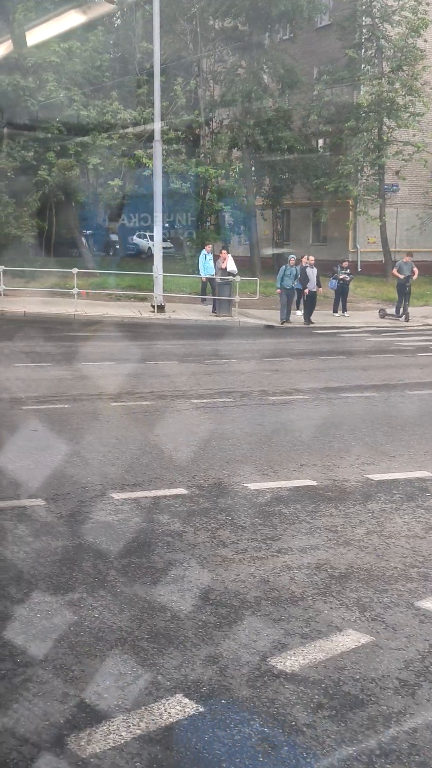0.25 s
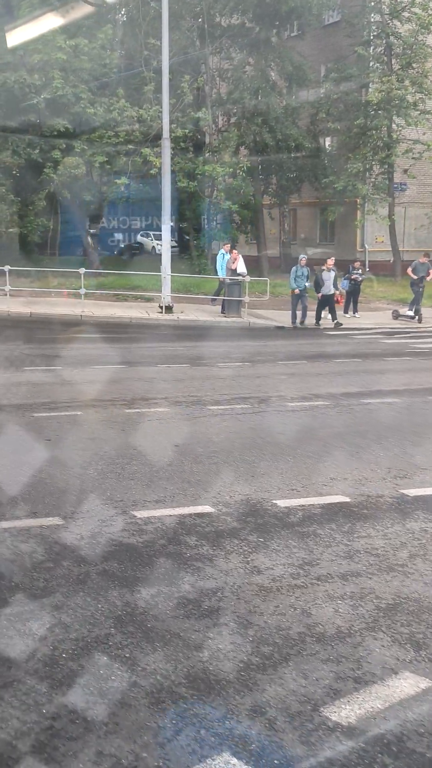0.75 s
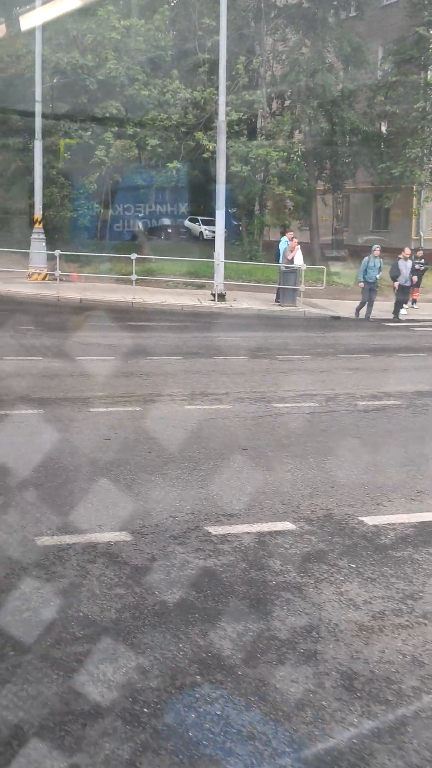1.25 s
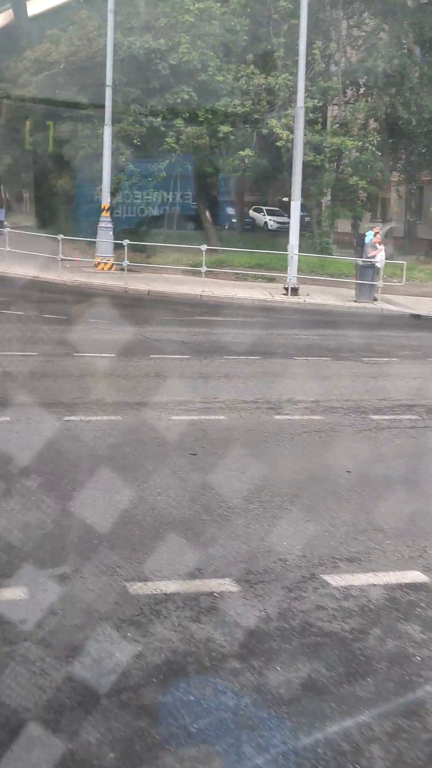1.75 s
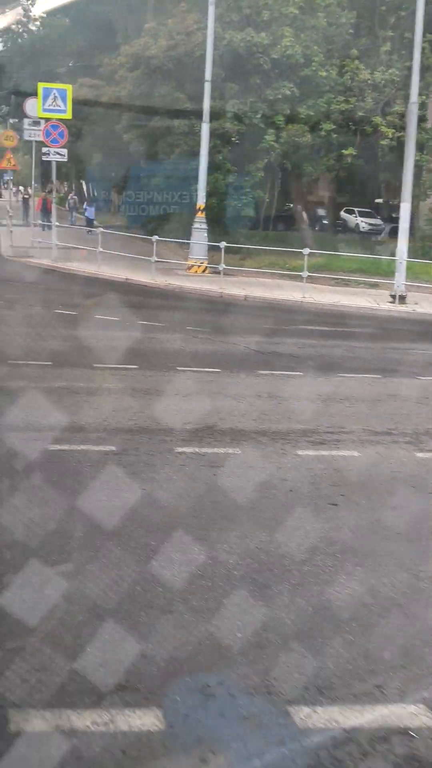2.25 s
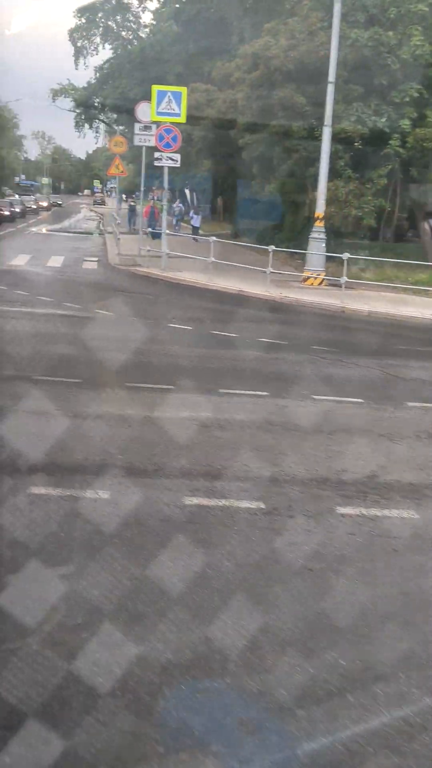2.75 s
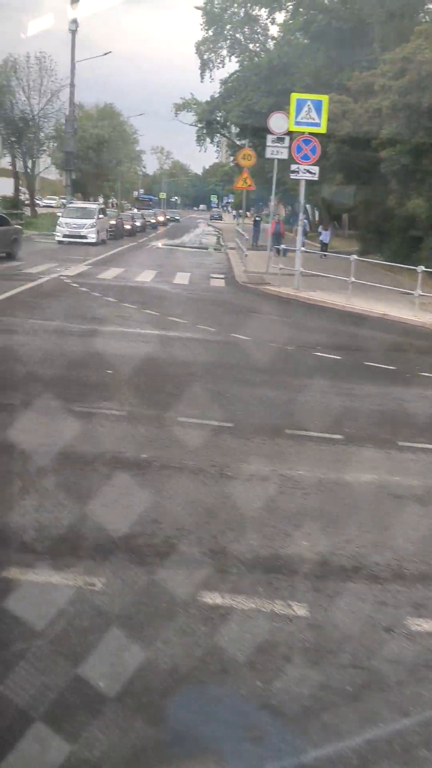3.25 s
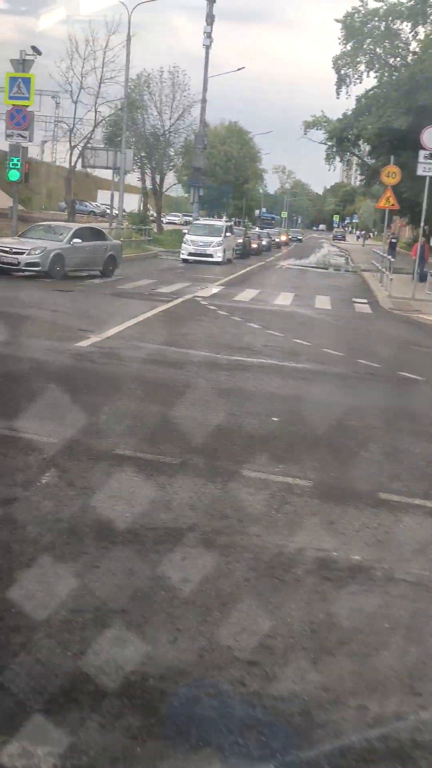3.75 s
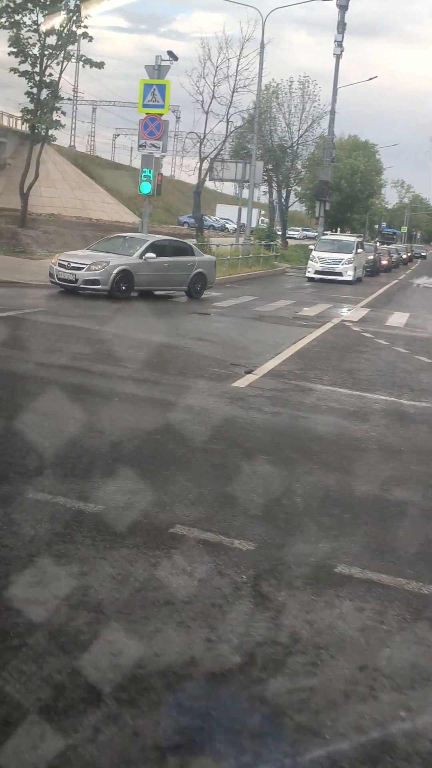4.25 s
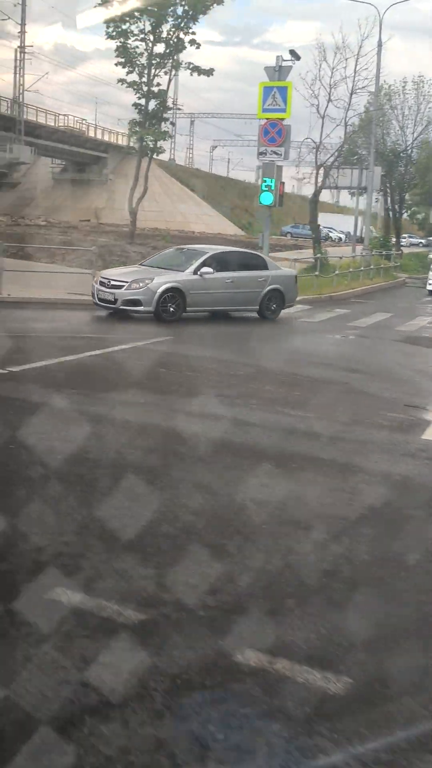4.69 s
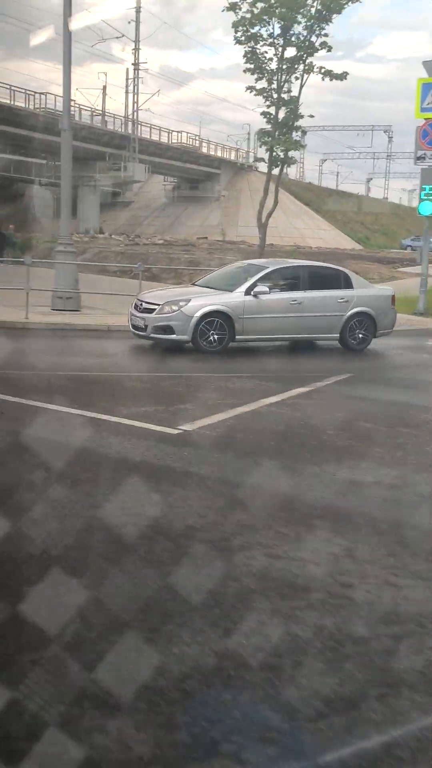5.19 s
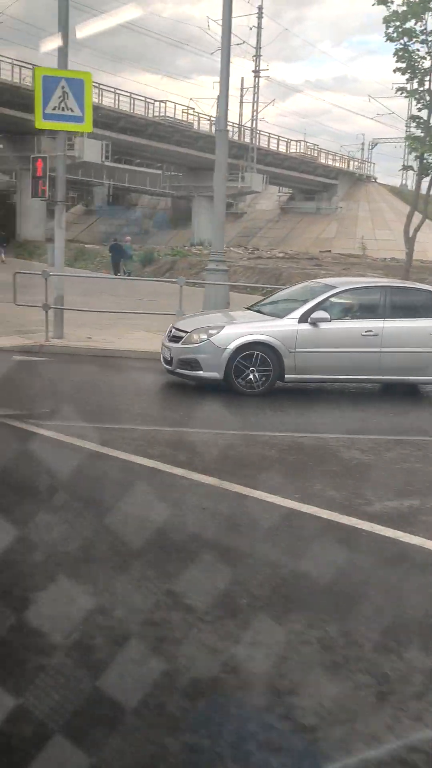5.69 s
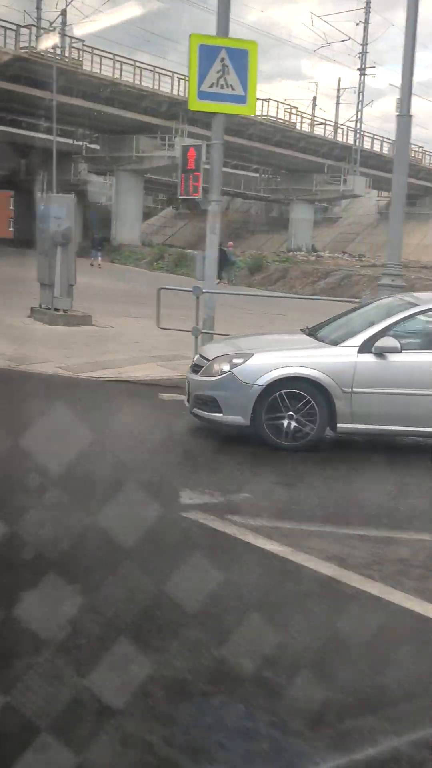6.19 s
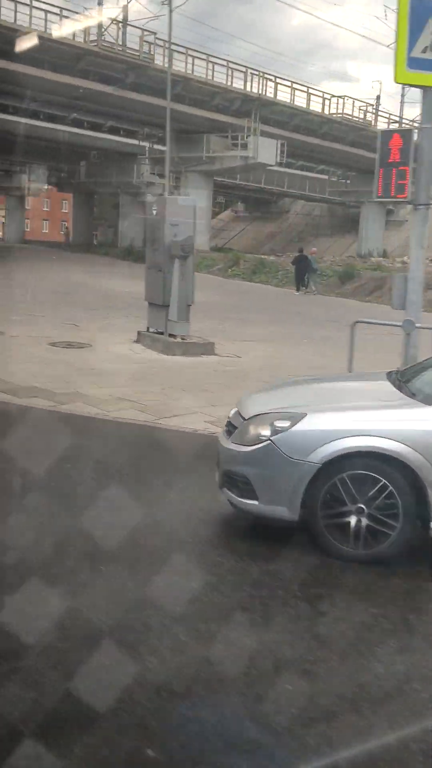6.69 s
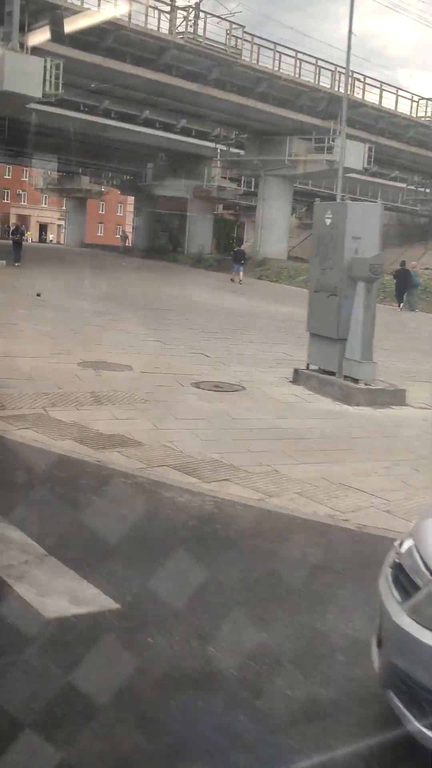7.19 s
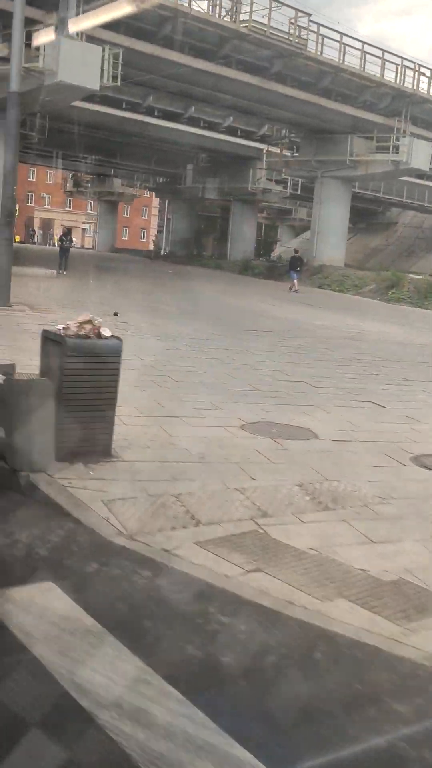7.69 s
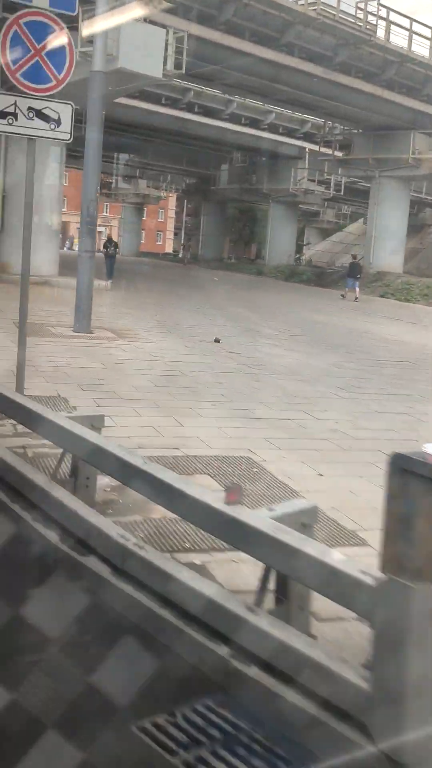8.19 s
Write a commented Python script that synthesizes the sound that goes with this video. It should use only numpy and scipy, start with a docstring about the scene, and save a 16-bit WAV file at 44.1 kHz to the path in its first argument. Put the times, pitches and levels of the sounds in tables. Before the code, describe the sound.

Inside a city bus, the diesel engine idles briefly, then pulls away through two gear changes with gear whine and road rumble.

```python
"""Inside a city bus, pulling away

The six-cylinder diesel idles, then runs up through two gear changes, its orders sweeping through the
cabin's booming resonances. Injectors clatter, the intake hisses and whistles as the turbo spools up,
an accessory drones and gears whine over the road's rumble and roar. A small electric motor sings
steadily, the body jolts twice and the trim ticks now and then."""
import sys
import numpy as np
from scipy import signal
from scipy.fft import rfft, irfft, next_fast_len
from scipy.io import wavfile
from scipy.ndimage import uniform_filter1d, minimum_filter1d

SR = 44100
rng = np.random.default_rng(int(sys.argv[2]) if len(sys.argv) > 2 else 0)


def unload_wav(signal):
    """Save mono or channel-first audio to the path in sys.argv[1] as 16-bit WAV at rate SR, clipped to [-1, 1]."""
    wavfile.write(
        sys.argv[1],
        SR,
        np.round(np.clip(np.atleast_2d(signal).T, -1, 1) * 32767).astype(np.int16),
    )


N = 372204
T = np.arange(N) / SR
CYLINDERS = 6

# An order is a multiple of the four-stroke cycle rate, played at the nearest whole number. the accessory's
# note, its octave and a higher note (order, level [dB], extra at idle [dB])
ACCESSORY_NOTES = [(27, -37, -1.5), (54, -48.5, -3), (81.6, -55, -3.5)]
# notes of the timing gears (order, level [dB], extra at idle [dB])
TIMING_NOTES = [(48, -44, 0), (71.33, -53, 8), (95.3, -58, 4.5), (118.6, -68.5, 16.5), (191.2, -66.5, 11.5),
                (216.8, -59, -1)]
# the final drive's mesh, following road speed (time [s], pitch [Hz], level [dB])
FINAL_DRIVE = [(2.0, 386.2, -44), (2.6, 408.5, -28), (3.25, 439, -30.5), (3.75, 460, -37),
               (4.5, 454.6, -35.5), (5.0, 448.6, -31), (6.6, 468.3, -42.5), (7.5, 464.7, -35),
               (8.44, 471, -31.5)]


def gain_of(db):
    """Decibels to amplitude."""
    return 10 ** (np.asarray(db) / 20)


def unit_rms(x):
    """Scales to unit rms."""
    return x / np.sqrt(np.mean(x ** 2) + 1e-20)


def curves(rows):
    """One control signal for each column after the time."""
    times, *columns = np.transpose(rows)
    return [np.interp(T, times, column) for column in columns]


def spectrum_at(points, hz):
    """Reads a spectrum on a log-frequency axis."""
    point_hz, value = np.transpose(points)
    return np.interp(np.log(hz + 1), np.log(point_hz + 1), value)


def drift(rate_hz, points=4096, hop=128):
    """Slow random wander of unit size."""
    hz = np.fft.rfftfreq(points, hop / SR)
    slow = irfft(rfft(rng.standard_normal(points)) * np.exp(-(hz / rate_hz) ** 2))
    return np.interp(np.arange(N) / hop, np.arange(points), unit_rms(slow))


def noise(colour):
    """Unit-rms stereo noise of a given dB colour, alike in both ears in the bass only."""
    # likeness of the two ears (frequency [Hz], correlation)
    likeness = [(40, 0.44), (150, 1), (300, 0.89), (500, 0.53), (1000, -0.23), (2000, -0.078),
                (5000, 0.021), (12000, -0.03)]
    size = next_fast_len(N, True)
    hz = np.fft.rfftfreq(size, 1 / SR)
    mid, side = rfft(rng.standard_normal((2, size)))
    same = spectrum_at(likeness, hz)
    mid, side = mid * np.sqrt(1 + same), side * np.sqrt(1 - same)
    return unit_rms(irfft(np.array([mid + side, mid - side]) * gain_of(colour(hz)), size)[:, :N])


def tone(hz, level, start_turns, spread_hz=620):
    """A note in the cabin: standing waves pull the ears out of phase, more so as the pitch rises."""
    phase = 2 * np.pi * (np.cumsum(hz) / SR + start_turns) % (2 * np.pi)
    apart = np.minimum(hz / spread_hz, 1) * np.sin(hz / 23 + 2 * np.pi * rng.random())
    return np.sqrt(2) * level * np.cos(np.array([phase + apart, phase - apart], np.float32))


def lift(resonances, hz):
    """Gain in dB of a note as its pitch passes a set of resonances."""
    return sum(db * np.exp(-((hz - centre) / width) ** 2) for centre, width, db in resonances)


def with_speed(rpm, db_per_octave, cruise_rpm=1350):
    """Level change in dB as the engine runs faster or slower than cruising."""
    return db_per_octave * np.log2(rpm / cruise_rpm)


def engine_state(flywheel_s=.16, idle_fade_rpm=(710, 856)):
    """Crank speed smoothed by the flywheel, its cycle rate, the load and how far the engine idles."""
    # the revs through two gear changes (time [s], crank speed [rpm])
    revs = [(0, 704), (.65, 707), (.92, 975), (1.12, 1052), (1.36, 1064), (1.82, 1240), (2.17, 1242),
            (2.57, 1394), (3.08, 1417), (3.45, 1495), (3.78, 1530), (4.45, 1480), (4.87, 1270),
            (5.55, 1282), (6.15, 1425), (6.7, 1502), (7.33, 1281), (7.58, 1282), (8.15, 1380), (8.44, 1397)]
    # the driver pulls away, eases, presses on and lifts off sharply once (time [s], load [dB])
    pedal = [(0, -5.5), (.57, -8), (.78, -1.5), (1.1, -0.5), (2.5, 1.15), (3.3, -1.7), (3.7, 0.2),
             (4.4, -1.5), (5, 1.5), (6.3, 2.3), (6.38, -3.5), (6.85, -1.5), (7.2, 0.5), (7.5, 2),
             (7.9, 2.2), (8.44, 1.5)]
    rpm = uniform_filter1d(curves(revs)[0], round(flywheel_s * SR), mode="nearest")
    cycle_hz = rpm / 120 * (1 + .0006 * drift(10))  # two crank turns a cycle
    return rpm, cycle_hz, curves(pedal)[0], np.interp(rpm, idle_fade_rpm, (1, 0))


def engine(rpm, cycle_hz, load_db, idling, weak_db=-3, throb_rpm=(1264, 1490)):
    """Firing notes sweep the cabin's booms; unequal cylinders add sidebands that throb once a cycle."""
    # the firing note and its overtones (order, level [dB], extra at idle [dB])
    firing_notes = [(6, -50, -10), (12, -31.5, -17), (18, -34, 6)]
    # the cabin's standing waves (centre [Hz], width [Hz], lift [dB])
    booms = [(57.4, 5.6, 8.5), (67.86, 2.4, 17.5), (75, 4, 24), (128.7, 3.16, 13.5), (142.7, 8.1, 14),
             (192, 7.1, 7.5), (225, 12.4, 15)]
    # sidebands from the unequal cylinders (order, relative level [dB])
    sidebands = [(7, 4), (8, -9), (9, 8.5), (10, 6.5), (11, 6), (13, 1), (14, 5), (15, -25), (16, -17.5),
                 (17, 2.5), (19, 0), (20, 1.5), (21, 4), (22, -1.5), (23, -2.5), (24, 8.5), (26, -4),
                 (28, 8.5), (30, -6.5), (32, 5.5), (34, -11.5), (36, 8), (38, 0.5), (44, -10), (50, 2.5)]
    # how strongly the cabin answers the sidebands (frequency [Hz], gain [dB])
    cabin = [(35.0, -75), (58.0, -73), (74.0, -44), (84.0, -49.5), (92.0, -45.5), (115.0, -40),
             (145.0, -28), (185.0, -36), (207.0, -33), (226.0, -21.5), (237.0, -25), (250.0, -40.5),
             (330.0, -50.5), (450.0, -53.5), (650.0, -60.5), (1100.0, -76.5)]
    starts = rng.random(30)  # one phase for each firing order, shared by its sidebands
    out = np.zeros((2, N))
    for order, db, idle_db in firing_notes:
        hz = round(order) * cycle_hz
        level = gain_of(db + idle_db * idling + lift(booms, hz) + with_speed(rpm, 14))
        out += tone(hz, level * (1 + .2 * drift(4.4)), starts[round(order / CYLINDERS)])
    # at the top of each gear the sidebands fall in step and the throb deepens
    in_step = np.interp(rpm, throb_rpm, (.34, .8))
    effort_db = with_speed(rpm, 12) + .76 * load_db + 2 * idling
    sideband_db = {round(order): db for order, db in sidebands}
    strong_orders = {round(row[0]) for row in firing_notes + ACCESSORY_NOTES + TIMING_NOTES}
    for order in sorted(set(range(7, 57)) - strong_orders):
        hz = order * cycle_hz
        level = gain_of(sideband_db.get(order, weak_db) + spectrum_at(cabin, hz) + effort_db)
        stray = (1 - in_step) * (.5 * rng.standard_normal() + .06 * drift(2))
        out += tone(hz, level * (1 + .43 * drift(3.6)), starts[round(order / CYLINDERS)] + stray)
    return out


def injectors(cycle_hz, load_db, clatter_db=-49, load_share=.57, ring_s=.03):
    """One click a firing, each cylinder at its own strength, smeared by the ringing engine block."""
    # colour of the clatter (frequency [Hz], relative level [dB])
    clatter_colour = [(500, -25), (850, 0.5), (1100, 11), (1600, 1.5), (2300, -1.5), (2650, 0.5),
                      (3050, -5), (3480, 4), (3900, -14), (5500, -14.5), (6300, -11.5), (7200, -18.5),
                      (9000, -28.5)]
    firings = CYLINDERS * np.cumsum(cycle_hz) / SR
    nearest = np.round(firings).astype(int)
    samples_off = (firings - nearest) / (CYLINDERS * cycle_hz) * SR
    strength = rng.uniform(.6, 1, CYLINDERS)
    clicks = np.exp(-samples_off ** 2 / 2) * strength[nearest % CYLINDERS]
    t = np.arange(SR // 5) / SR
    hz = np.fft.rfftfreq(len(t), 1 / SR)
    ring = rng.standard_normal((2, len(t))) * np.exp(-t / ring_s)
    block = irfft(rfft(ring) * gain_of(spectrum_at(clatter_colour, hz)), len(t))
    clatter = signal.oaconvolve(clicks[None], block, axes=1)[:, :N]
    return unit_rms(clatter) * gain_of(clatter_db + load_share * load_db)


def turbo_boost(cycle_hz, idling, lag_s=2.5, full_boost=1.35):
    """The turbo spools up slowly once the engine leaves idle."""
    keep = np.exp(-1 / (lag_s * SR))
    drive = (1 - idling) * cycle_hz / cycle_hz.max()
    return full_boost * signal.lfilter([1 - keep], [1, -keep], drive)


def intake(cycle_hz, load_db, boost, hiss_db=-44, whistle_db=-47, spurts_db=1.5, rise=.045):
    """Hiss pulsing with the firings, and fuzzy whistles that come in spurts and climb with boost."""
    # colour of the rushing air (frequency [Hz], relative level [dB])
    hiss_colour = [(900, -6), (1700, 3), (2500, 1.5), (3100, -1), (4500, -0.5), (5200, -1.5), (5900, -4),
                   (7200, -7.5), (8450, -4.5), (8750, -14.5), (10500, -12.5), (13000, -17.5), (15700, -15)]
    # whistles under boost (centre [Hz], half-width [Hz], relative level [dB])
    whistles = [(3440, 28, -7), (3570, 210, -6), (6150, 710, -3.5), (8300, 160, -10.5)]
    out = noise(lambda hz: spectrum_at(hiss_colour, hz)) * gain_of(hiss_db + load_db + drift(19))
    pedal_db = .53 * load_db  # the spinning turbo follows the pedal less than the hiss does
    for centre_hz, width_hz, db in whistles:
        band = noise(lambda hz: -20 * np.log10(1 + ((hz - centre_hz) / width_hz) ** 2))
        glide = np.exp(2j * np.pi * np.cumsum(centre_hz * rise * (boost - 1)) / SR)
        level = boost * gain_of(db + whistle_db + pedal_db + spurts_db * drift(14))
        out += (signal.hilbert(band, next_fast_len(N))[:, :N] * glide).real * level
    firing = np.cos(2 * np.pi * CYLINDERS * np.cumsum(cycle_hz) / SR)
    return out * (1 + .042 * firing)


def crank_notes(notes, panels, cycle_hz, idling, rough):
    """Notes locked to the crank; each swells as it passes the resonance of a panel."""
    out = np.zeros((2, N))
    for order, db, idle_db in notes:
        hz = round(order) * cycle_hz
        level = gain_of(db + idle_db * idling + lift(panels, hz))
        out += tone(hz, level * (1 + rough * drift(6.5)), rng.random())
    return out


def accessory(cycle_hz, idling):
    """An engine-driven accessory drones through the panels."""
    # panels it shakes (centre [Hz], width [Hz], lift [dB])
    panels = [(158, 28, 14), (239, 15.4, 19.5), (280.2, 13.1, 16), (312.8, 15.2, 14.5), (494, 34, 14.5),
              (566, 17, 10.5), (623, 17, 11.5), (841, 26, 20.5)]
    return crank_notes(ACCESSORY_NOTES, panels, cycle_hz, idling, rough=.17)


def timing_gears(cycle_hz, idling):
    """The timing gears whine, rising and falling with the revs."""
    # panels they shake (centre [Hz], width [Hz], lift [dB])
    panels = [(495, 4.8, 7.5), (553, 16, 9), (613, 16, 7), (688, 40, 9.5), (752, 20, 15),
              (870.7, 18.7, 11.5), (911, 18, 9)]
    return crank_notes(TIMING_NOTES, panels, cycle_hz, idling, rough=.28)


def final_drive(overtone_db=-16, rough=.2):
    """The final drive's teeth whine, rising with road speed."""
    hz, db = curves(FINAL_DRIVE)
    level = gain_of(db) * (1 + rough * drift(3.8))
    return tone(hz, level, rng.random()) + tone(2 * hz, level * gain_of(overtone_db), rng.random())


def road(rpm, load_db, idling, rumble_db=-21.5, roar_db=-31.5, flutter_db=1.22):
    """Panels rumble with speed and load; tyres and engine bay roar through the floor, more under load."""
    # colour of the panel rumble (frequency [Hz], relative level [dB])
    rumble_colour = [(20, -34.5), (40, -24.5), (58, -24), (74, -6), (92, -16), (140, -1.5), (190, -8),
                     (226, 7.5), (262, -20), (340, -12), (450, -18), (650, -33), (1000, -58.5)]
    # colour of the roar (frequency [Hz], relative level [dB])
    roar_colour = [(150, -27.5), (350, 4), (450, 5.5), (520, -5), (620, 4.5), (720, -6), (790, -2),
                   (860, -4), (1000, -6), (1200, -12.5), (1420, -11), (1650, -27), (2400, -25.5),
                   (4000, -55.5)]
    mesh_hz, _ = curves(FINAL_DRIVE)
    rolling_db = 11 * np.log2(mesh_hz / mesh_hz.max())
    effort_db = with_speed(rpm, 4) + .5 * load_db - 3 * idling
    rumble = noise(lambda hz: spectrum_at(rumble_colour, hz))
    rumble *= gain_of(rumble_db + rolling_db + effort_db)
    roar = noise(lambda hz: spectrum_at(roar_colour, hz))
    roar *= gain_of(roar_db + .87 * load_db + flutter_db * drift(25))
    return rumble + roar


def electric_motor(waver=.00097, flutter_db=2.2):
    """A small electric motor sings thin, steady tones that flutter in each ear."""
    # its tones (pitch [Hz], level [dB])
    tones = [(2785, -60.5), (4177, -50.5), (5570, -64)]
    # their shared swell (time [s], gain [dB])
    swell = [(0, -4.5), (1.3, -1.5), (3.3, -4.5), (4.2, -7.5), (5.1, 0), (6.5, -7), (7.2, -3.5),
             (8.44, -6.5)]
    swell_db, = curves(swell)
    speed = 1 + waver * drift(3.26)
    out = np.zeros((2, N))
    for hz, db in tones:
        flutter = flutter_db * np.array([drift(22), drift(22)])
        out += tone(hz * speed, gain_of(db + swell_db + flutter), rng.random(), spread_hz=6000)
    return out


def knocks(rows, attack_s, stereo_width):
    """Short bursts of noise in one band each, dying away."""
    out, t = np.zeros((2, N)), np.arange(SR // 2) / SR
    hz = np.fft.rfftfreq(len(t), 1 / SR) + 1
    for start_s, db, centre_hz, octaves, decay_s in rows:
        band = np.exp(-.5 * (np.log2(hz / centre_hz) / octaves) ** 2)
        mid, side = irfft(band * np.exp(2j * np.pi * rng.random((2, len(hz)))), len(t))
        stereo = np.array([mid + stereo_width * side, mid - stereo_width * side])
        envelope = (1 - np.exp(-t / attack_s)) * np.exp(-t / decay_s)
        burst = unit_rms(stereo * envelope) * np.sqrt(np.mean(envelope ** 2))
        slot = out[:, round(start_s * SR):][:, :len(t)]
        slot += gain_of(db) * burst[:, :slot.shape[1]]
    return out


def body_jolts():
    """The body jolts with soft, low thuds near the centre."""
    # thuds (time [s], level [dB], centre [Hz], width [octaves], decay [s])
    jolts = [(.69, -20.5, 76, 0.041, 0.079), (6.31, -26, 42, .6, 0.043)]
    return knocks(jolts, attack_s=.044, stereo_width=.1)


def trim_ticks():
    """The trim ticks, squeaks and scuffs, bright and wide."""
    # small trim noises (time [s], level [dB], centre [Hz], width [octaves], decay [s])
    ticks = [(.72, -53, 5650, .02, .07), (1.424, -39, 4500, 0.31, 0.071), (3.29, -40.5, 10400, 0.95, 0.025),
             (4.602, -36, 7990, 0.87, 0.013), (4.82, -48, 12000, 0.45, .02),
             (6.93, -46, 12060, 0.59, 0.027), (7.33, -41, 6300, 0.027, 0.038)]
    return knocks(ticks, attack_s=.0027, stereo_width=1)


def scene():
    """Everything heard from a window seat."""
    rpm, cycle_hz, load_db, idling = engine_state()
    diesel = engine(rpm, cycle_hz, load_db, idling) + injectors(cycle_hz, load_db)
    diesel += intake(cycle_hz, load_db, turbo_boost(cycle_hz, idling))
    diesel += accessory(cycle_hz, idling) + timing_gears(cycle_hz, idling)
    rattles = trim_ticks() + body_jolts()
    return diesel + final_drive() + road(rpm, load_db, idling) + electric_motor() + rattles


def record(dry, ceiling=.74, cutoff_hz=15800):
    """A limiter holds down the tallest throbs; a steep low-pass takes off the very top."""
    allowed_gain = np.minimum(1, ceiling / (abs(dry).max(0) + 1e-9))
    limited = dry * uniform_filter1d(minimum_filter1d(allowed_gain, size=700), size=700)
    lowpass = signal.firwin(511, cutoff_hz, window=("kaiser", 9), fs=SR)
    return signal.oaconvolve(limited, lowpass[None], "same")


dry = scene()
out = record(dry)
unload_wav(out)
```